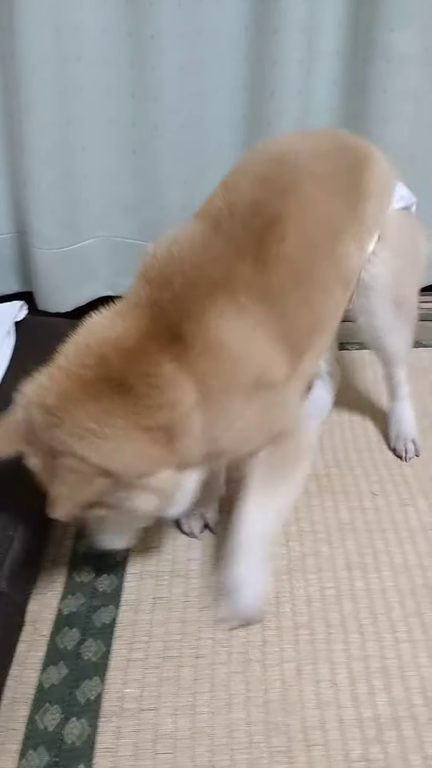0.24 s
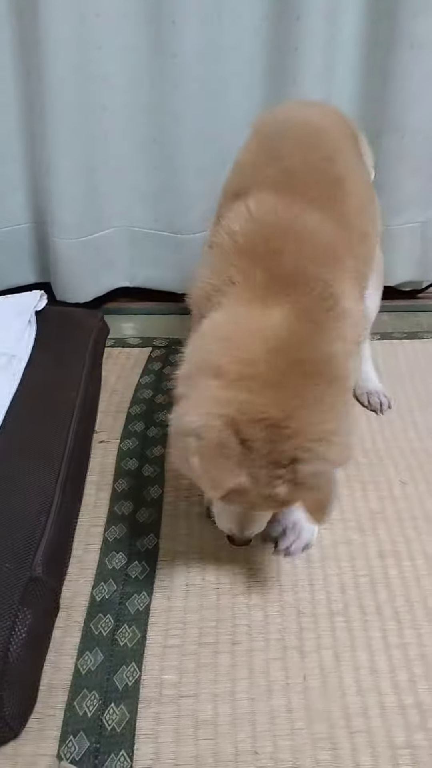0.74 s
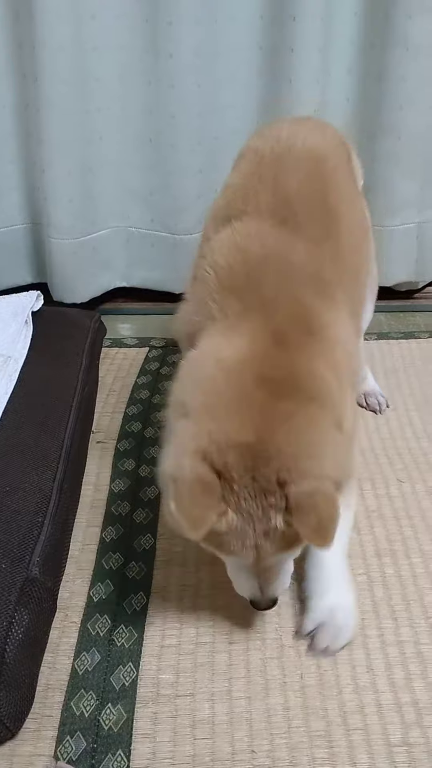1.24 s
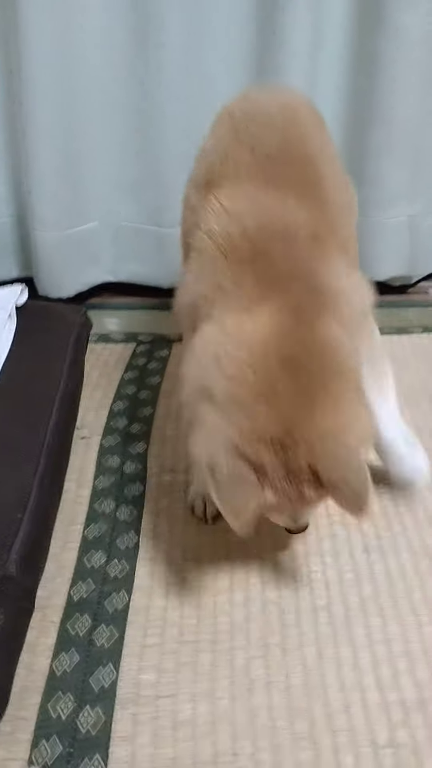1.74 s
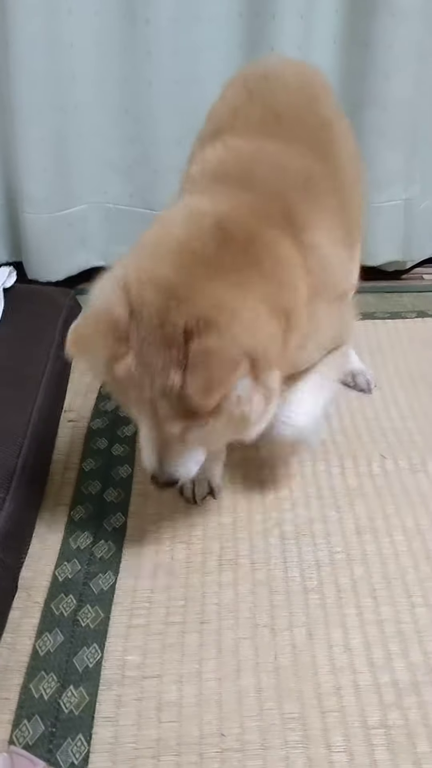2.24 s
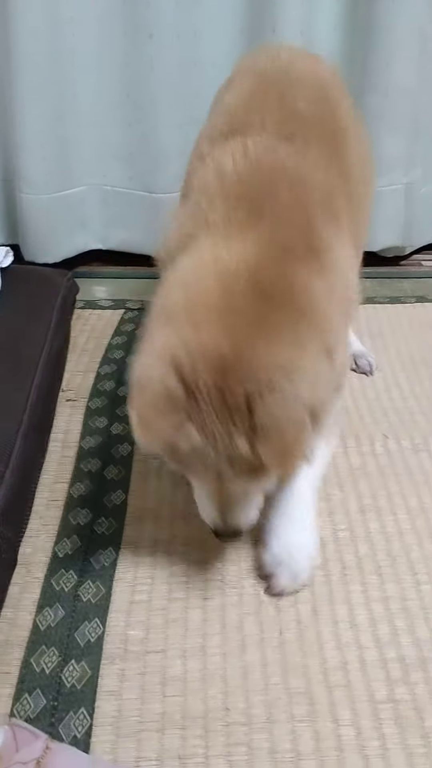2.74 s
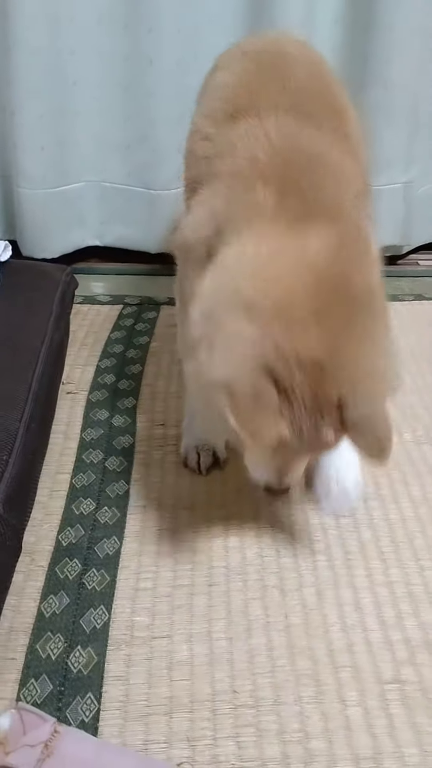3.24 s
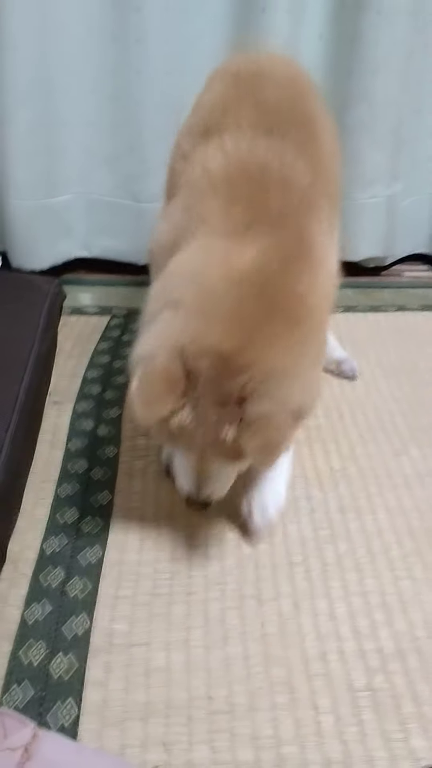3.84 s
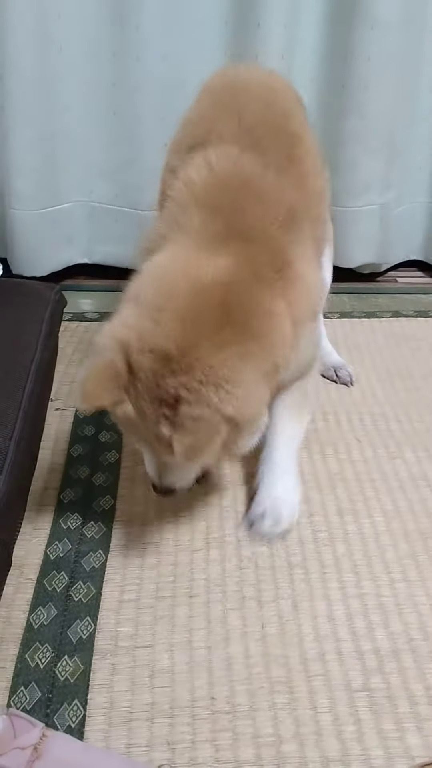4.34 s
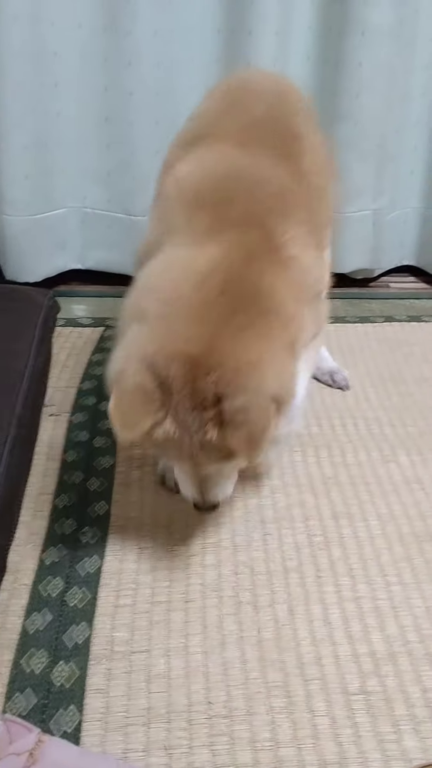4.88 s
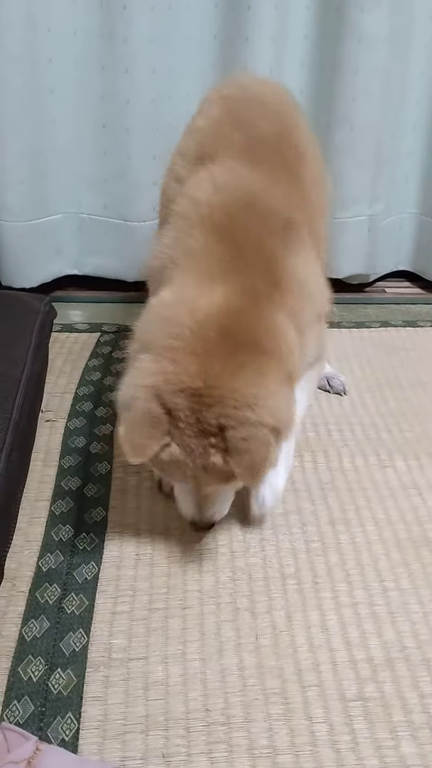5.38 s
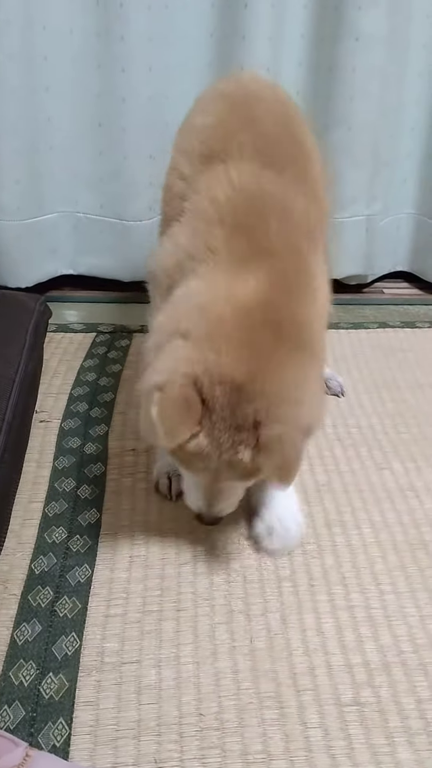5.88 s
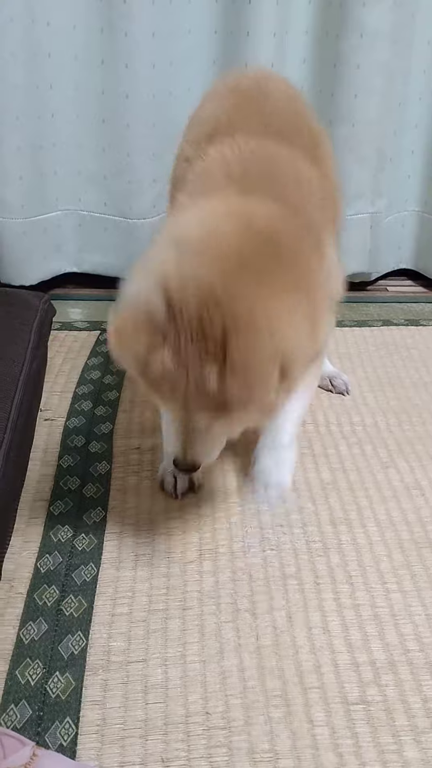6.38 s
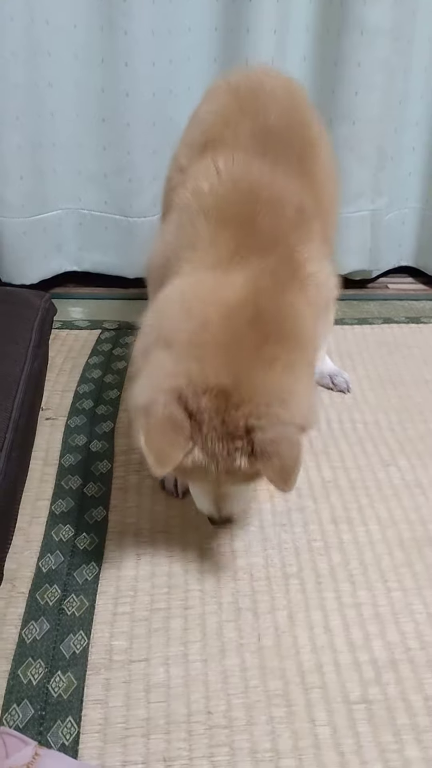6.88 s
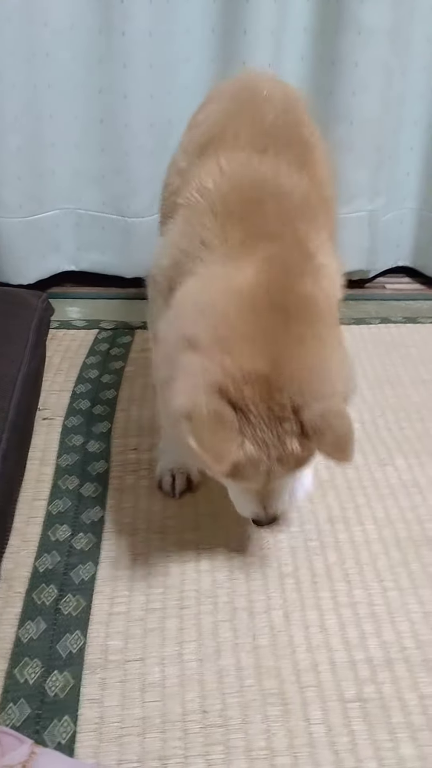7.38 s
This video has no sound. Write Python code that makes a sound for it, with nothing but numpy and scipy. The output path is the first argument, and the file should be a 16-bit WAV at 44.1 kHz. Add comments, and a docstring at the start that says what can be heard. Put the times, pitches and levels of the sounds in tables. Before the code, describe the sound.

A dog's claws scrape a woven straw mat in steady, separate strokes, soft at first, then loud, raspy and crackling, in a small room.

```python
"""A dog digging at a straw mat

A dog digs at a woven straw mat with one forepaw, nearly three strokes a second, in a small curtained room.
The claws pluck the taut straws one by one: each gives a short, damped swing (a dull pop) and a noise burst (a tick).
As the paw speeds up, many tiny random slips run together into a dry rasp, and low filtered noise makes the mat thud.
Soft pads slide on the straw, the floor creaks with fading tones and the dog whines with two wavering whistles.
Echoes of fading noise make the room, and a steady, faint noise lies below."""
import sys
import numpy as np
from scipy import signal
from scipy.fft import rfft, irfft, next_fast_len
from scipy.io import wavfile
from scipy.ndimage import uniform_filter1d, map_coordinates

SR = 44100
rng = np.random.default_rng(int(sys.argv[2]) if len(sys.argv) > 2 else 0)


def bounce(signal):
    """Save signal as a 16-bit WAV file at the path given by the first command-line argument."""
    frames = np.transpose(np.atleast_2d(signal))
    limited = np.clip(frames, -1, 1)
    pcm = np.round(limited * 32767).astype(np.int16)
    wavfile.write(sys.argv[1], SR, pcm)


N = 336042

# Each stroke: the paw lands, drags lightly, bears down, pulls and lifts off. All levels are relative settings.
# (landing time [s], drag length [s], bearing-down length [s], pull length [s], landing level [dB],
#  drag level [dB], then in the pull: plucking [dB], rasp [dB], ticking [dB], thud against the rasp [dB])
STROKES = [(0.182, 0.075, 0.04, 0.1, -62.0, -66.0, -50.5, -55.5, -55.5, -4.0),
           (0.411, 0.056, 0.071, 0.068, -63.0, -62.0, -61.0, -65.5, -64.0, -3.0),
           (0.816, 0.033, 0.04, 0.015, -70.5, -65.0, -53.5, -62.5, -58.0, -4.0),
           (0.994, 0.023, 0.038, 0.007, -64.0, -64.0, -52.0, -57.5, -69.0, -7.0),
           (1.281, 0.131, 0.046, 0.053, -60.5, -55.5, -43.5, -50.5, -50.0, -8.0),
           (1.646, 0.093, 0.061, 0.089, -55.5, -59.0, -39.0, -44.5, -46.0, -11.0),
           (2.068, 0.129, 0.02, 0.047, -49.0, -57.0, -38.0, -41.0, -46.5, -3.0),
           (2.46, 0.123, 0.028, 0.04, -47.5, -48.5, -40.0, -43.0, -45.5, 1.0),
           (2.816, 0.115, 0.041, 0.062, -55.0, -55.5, -37.5, -42.5, -45.0, 1.5),
           (3.211, 0.099, 0.089, 0.072, -51.0, -53.0, -38.0, -43.0, -47.0, 1.0),
           (3.562, 0.11, 0.069, 0.071, -60.5, -67.5, -40.5, -45.0, -49.0, 0.0),
           (3.949, 0.089, 0.049, 0.068, -55.0, -54.0, -40.5, -45.0, -48.0, 0.0),
           (4.33, 0.083, 0.06, 0.073, -53.5, -54.5, -40.0, -48.0, -48.0, -1.0),
           (4.655, 0.15, 0.04, 0.055, -52.0, -57.5, -35.5, -43.0, -42.5, 0.0),
           (5.12, 0.125, 0.062, 0.055, -62.5, -70.5, -41.5, -46.5, -49.0, -2.0),
           (5.531, 0.143, 0.081, 0.067, -61.0, -63.0, -41.0, -44.0, -49.0, 2.5),
           (5.941, 0.109, 0.067, 0.049, -46.5, -54.0, -41.0, -43.0, -45.5, 1.0),
           (6.303, 0.099, 0.045, 0.059, -49.5, -51.5, -37.5, -41.5, -44.0, 2.0),
           (6.701, 0.078, 0.056, 0.09, -60.5, -55.5, -38.5, -45.5, -47.0, 1.0),
           (7.04, 0.204, 0.03, 0.061, -54.0, -62.0, -41.0, -45.5, -46.0, 4.0),
           (7.531, 0.098, 0.064, 0.078, -56.5, -58.5, -38.0, -47.5, -50.5, 3.0)]
# A claw catches hard and snaps free: (time [s], pop level [dB], tick level [dB]), before colouring
SNAGS = [(0.259, -28.5, -33), (0.265, -36, -32), (0.29, -44, -30), (0.363, -44, -37.5), (0.459, -37, -42),
         (0.501, -39, -55), (0.648, -62, -48), (0.676, -67, -41), (0.845, -41, -53), (0.853, -45, -39.5),
         (0.867, -51, -39.5), (0.996, -42, -55), (1.01, -41, -25), (1.327, -40, -37.5), (1.374, -32.5, -43),
         (1.398, -30, -44.5), (1.419, -37.5, -33), (1.682, -37, -42.5), (1.697, -38, -26.5),
         (1.712, -30, -49), (1.722, -27.5, -20), (1.731, -27, -32), (2.139, -37, -40.5), (2.185, -35, -33),
         (2.191, -30, -33), (2.215, -33, -29.5), (2.48, -39, -34.5), (2.487, -39, -45.5),
         (2.501, -41.5, -27.5), (2.51, -24.5, -19), (2.547, -37, -25), (2.575, -27.5, -16.5),
         (2.605, -40, -15), (2.846, -40.5, -30), (2.899, -37.5, -42.5), (2.924, -21.5, -26),
         (2.931, -22.5, -39.5), (3.232, -41.5, -49), (3.263, -31.5, -31), (3.297, -31, -29.5),
         (3.369, -27, -37.5), (3.386, -32.5, -41), (3.601, -41.5, -41.5), (3.635, -33, -36),
         (3.671, -24, -15), (3.726, -29.5, -42.5), (3.748, -30, -46), (3.984, -36, -41),
         (4.051, -26, -37.5), (4.088, -32.5, -33), (4.404, -28.5, -26), (4.435, -32, -28.5),
         (4.692, -44, -35), (4.752, -32, -22), (4.781, -28.5, -38), (4.804, -19, -24),
         (4.808, -17.5, -18.5), (4.812, -22, -28), (4.816, -20.5, -28), (5.193, -33, -37),
         (5.291, -30, -34), (5.612, -32, -40), (5.652, -26, -45), (5.672, -27, -36), (5.723, -24, -40),
         (5.996, -39, -41), (6.058, -24, -28), (6.364, -37.5, -42), (6.387, -22.5, -19),
         (6.396, -23.5, -35), (6.413, -20.5, -32), (6.425, -19.5, -26.5), (6.442, -33, -17),
         (6.732, -38.5, -45.5), (6.77, -24.5, -30.5), (6.783, -28, -43.5), (7.114, -40, -32.5),
         (7.186, -30, -42), (7.232, -29, -21), (7.237, -32, -24), (7.243, -23, -20), (7.253, -23, -31.5),
         (7.564, -39.5, -45.5), (7.585, -32, -50), (7.599, -31.5, -33)]
# Colour of a plucked straw: (frequency [Hz], gain [dB])
PLUCK_COLOUR = [(30, -35.5), (100, -29.5), (300, -4.5), (600, 4), (1800, -0.5), (2800, 4), (4500, -9.5),
                (9000, -17)]
# Colour of claws scraping fine fibres: (frequency [Hz], gain [dB])
RASP_COLOUR = [(100, -24), (250, -20.5), (500, 3), (900, 4.5), (2000, 1.5), (3000, 5.5), (4200, 3),
               (6000, 0), (8500, -1), (16000, -16.5)]
# Colour of a hard claw tip on dry straw: (frequency [Hz], gain [dB])
TICK_COLOUR = [(500, -22), (2500, -8), (5000, -4), (9000, -1), (16000, 0)]


def amp(db):
    """Decibels turned into a plain multiplier."""
    return 10 ** (np.asarray(db) / 20)


def unit(x):
    """x scaled to an average (rms) strength of 1."""
    return x / np.sqrt(np.mean(x ** 2) + 1e-20)


def along(points, hz):
    """Values between (frequency, value) points, read on a log frequency axis."""
    f, v = np.transpose(points)
    return np.interp(np.log(hz + 1), np.log(f + 1), v)


def curves(rows):
    """One value per sample for each column after the time."""
    s, *columns = np.transpose(sorted(map(tuple, rows)))
    return [np.interp(np.arange(N) / SR, s, column) for column in columns]


def filtered(x, response):
    """x times a complex response at each frequency."""
    size = x.shape[-1]
    padded = next_fast_len(size + SR // 4)
    spectrum = rfft(x, padded) * response(np.fft.rfftfreq(padded, 1 / SR))
    return irfft(spectrum, padded)[..., :size]


def coloured(x, db_of_hz, size=8192):
    """x through a filter with the given gain that, like a real object, never answers before it is struck."""
    cepstrum = irfft(np.log(amp(db_of_hz(np.fft.rfftfreq(size, 1 / SR)))))
    # folding the second half onto the first puts the whole answer after the strike
    cepstrum[1:size // 2] *= 2
    cepstrum[size // 2 + 1:] = 0
    answer = irfft(np.exp(rfft(cepstrum)))
    return signal.fftconvolve(x, np.array(answer, ndmin=x.ndim), axes=-1)[..., :N]


def shaped(x, spectrum):
    """x coloured by (frequency, gain) points."""
    return coloured(x, lambda hz: along(spectrum, hz))


def placed(times, grains):
    """Sum of short sounds, one row each, starting at their times."""
    starts = np.round(np.maximum(times, 0) * SR).astype(int)
    at = starts[:, None] + np.arange(grains.shape[1])
    return np.bincount(at.ravel(), grains.ravel(), N)[:N]


def diffuse(pair):
    """Two unrelated noises mixed as two microphone ports hear them: more alike in the bass."""
    # Sound from all sides at the two ports: (frequency [Hz], likeness [0 to 1])
    likeness = [(100, 0.913), (300, 0.63), (700, 0.696), (1400, 0), (3000, 0), (7000, 0)]

    def shares(hz):
        turn = np.arccos(np.clip(along(likeness, hz), -1, 1)) / 2
        return np.array([np.cos(turn), np.sin(turn)])

    mid, side = filtered(pair, shares)
    return np.array([mid + side, mid - side])


def stroke_level(rule, pull_column, bear_down_db=20, grip_s=0.034, touch_db_per_s=560):
    """Level [dB] of one sound: each stroke is a pat, a light drag, then a pull that swells, sags and is released."""
    pat_share, drag_share, lag, sag, fade = rule
    power = np.zeros(N)
    for stroke in STROKES:
        s, drag_s, bear_s, pull_s, land_db, drag_db = stroke[:6]
        start = round(s * SR)
        age = np.arange(min(SR // 2, N - start)) / SR
        pulled = np.maximum(age - drag_s, 0)
        pat = land_db + pat_share - touch_db_per_s * age
        # the claws reach the straw only grip_s after the landing
        off_straw = np.maximum(grip_s - age, 0) + pulled
        drag = drag_db + drag_share - touch_db_per_s * off_straw
        # the scrape grows while the paw bears down at the end of the drag
        swell = -bear_down_db * (np.minimum(age - drag_s - lag, 0) / bear_s) ** 2
        lifted = np.maximum(pulled - pull_s, 0)
        pull = stroke[pull_column] + swell - sag * pulled - fade * lifted
        power[start:start + len(age)] += amp(pat) ** 2 + amp(drag) ** 2 + amp(pull) ** 2
    return 10 * np.log10(power + 1e-12)


def stroke_levels(waver_db=1.0, waver_rate=45):
    """Plucking, rasp and ticking levels [dB]: they waver together as the claws press unevenly, and die as the paw lifts."""
    # How each sound follows a stroke: (level over the landing [dB], level over the drag [dB], lag [s],
    # sag in the pull [dB/s], fade after the lift [dB/s])
    pluck_rule = (-4, -2.5, 0, 70, 490)
    rasp_rule = (-8, -6, 0.006, 16, 520)
    tick_rule = (-18, -6, 0, 98, 490)
    # waver_rate random values a second, joined smoothly
    knots = rng.standard_normal(int(N * waver_rate / SR) + 4).clip(-1.5, 1.5)
    grip_db = waver_db * map_coordinates(knots, [np.arange(N) * waver_rate / SR])
    layers = [(pluck_rule, 6), (rasp_rule, 7), (tick_rule, 8)]
    return [stroke_level(rule, column) + grip_db for rule, column in layers]


def crossings(rate, scatter):
    """Uneven times at which claws cross a straw, and the rate [per second] at each."""
    passed = np.cumsum(rate) / SR
    marks = np.arange(int(passed[-1]))
    uneven = marks + scatter * rng.standard_normal(len(marks))
    at = np.minimum(np.searchsorted(passed, uneven), N - 1)
    return at / SR, rate[at]


def pops(hz, cycles, size=400):
    """A plucked straw swings about twice before the padding stops it; the outline of the swing peaks at 1."""
    phase = hz[:, None] * np.arange(size) / SR
    outline = phase / cycles * np.exp(1 - phase / cycles)
    return -np.sin(2 * np.pi * phase) * outline


def ticks(count, life, size=160):
    """Hard claw on dry straw: noise bursts that fade with the given life [s]."""
    return rng.standard_normal((count, size)) * np.exp(-np.arange(size) / SR / life)


def plucking(pluck_db, tick_db, speed, slow_rate=200, fast_rate=400, pop_hz=1400, rise=0.217,
             spread=0.2855, size_db=3, tick_size_db=3.6):
    """Claws ride over the weave: more and higher pops as the paw gains speed. Also gives the jerk of each release."""
    times, rate = crossings(slow_rate + (fast_rate - slow_rate) * speed, scatter=.35)
    force, pitch, sharpness = rng.standard_normal((len(times), 3)).clip(-1.7, 1.7).T
    speed_then = np.interp(times, np.arange(N) / SR, speed)
    hz = pop_hz * np.exp(rise * speed_then + spread * pitch)
    # dividing by the rate keeps the strength even where pops crowd together
    pop_size = amp(size_db * force) * np.sqrt(hz / rate)
    tick_size = amp(tick_size_db * (force + sharpness) / np.sqrt(2)) / np.sqrt(rate)
    swings = pop_size[:, None] * pops(hz, cycles=0.4964)
    cracks = tick_size[:, None] * ticks(len(times), life=0.00087)
    dull = shaped(placed(times, swings), PLUCK_COLOUR)
    bright = shaped(placed(times, cracks), TICK_COLOUR)
    jerk = placed(times, tick_size[:, None] * np.exp(-np.arange(SR // 100) / SR / .0017))
    plucks = amp(pluck_db - 1.3) * unit(dull) + amp(tick_db + 4.9) * unit(bright)
    return plucks, unit(jerk)


def fibres(rate, size_db):
    """Tiny random slips across the width of the paw, as both ports hear them; rate is per second."""
    slips = (rng.random((2, N)) < rate / SR) * np.sign(rng.standard_normal((2, N)))
    sizes = amp(size_db * rng.standard_normal((2, N)).clip(-2, 2))
    return diffuse(slips * sizes)


def rasping(rasp_db, jerk, steady=0.584):
    """Fine fibres catch and slip under the claws, most of all just after each straw lets go."""
    slips = (steady + jerk) * fibres(rate=3500, size_db=4)
    return amp(rasp_db + 2) * unit(shaped(slips, RASP_COLOUR))


def held(hold_db=-8, hold=0.00459):
    """A caught claw stands still for a few milliseconds before it snaps free, so the scraping dips."""
    t = np.arange(N) / SR
    releases = np.append(np.sort(np.array(SNAGS)[:, 0]), np.inf)
    wait = releases[np.searchsorted(releases, t)] - t
    # a short running average softens the sudden end of each dip
    stillness = uniform_filter1d(np.exp(-(wait / hold) ** 2), size=32)
    return amp(hold_db * stillness)


def snags(speed, slow_hz=1270, rise=0.3, spread=0.05):
    """Single hard catches of a claw: a pop of the straw, higher under a fast paw, and a tick of the claw tip."""
    s, pop_db, tick_db = np.transpose(SNAGS)
    speed_then = np.interp(s, np.arange(N) / SR, speed)
    hz = slow_hz * np.exp(rise * speed_then + spread * rng.standard_normal(len(s)))
    swings = amp(pop_db)[:, None] * pops(hz, cycles=.5)
    cracks = ticks(len(s), life=.0005)
    cracks = cracks / np.abs(cracks).max(axis=1, keepdims=True)
    cracks = amp(tick_db)[:, None] * cracks
    return shaped(placed(s, swings), PLUCK_COLOUR) + shaped(placed(s, cracks), TICK_COLOUR)


def landings(pop_db=10, pop_hz=1250, crack_db=1.5, tick_db=0, second_claw_s=0.008, second_claw_db=-4):
    """At each landing two claws touch down in turn; each pops one straw, with a dry crack and a bright tick."""
    s, land_db = np.array(STROKES)[:, [0, 4]].T
    s = np.append(s, s + second_claw_s)
    size = amp(np.append(land_db, land_db + second_claw_db))[:, None]
    # pop, crack and tick are set against the level of the landing
    swings = amp(pop_db) * pops(np.full(len(s), pop_hz), cycles=.5)
    cracks = placed(s, size * ticks(len(s), life=.001))
    popped = shaped(placed(s, size * swings), PLUCK_COLOUR)
    dry_crack = amp(crack_db) * shaped(cracks, RASP_COLOUR)
    return popped + dry_crack + amp(tick_db) * shaped(cracks, TICK_COLOUR)


def thudding(rasp_db):
    """The thick mat shakes with the force of the stroke, more when the dog leans on the paw."""
    # Colour of the shaking mat: (frequency [Hz], gain [dB])
    thud_colour = [(20, -37), (35, -22.5), (55, -1), (110, -3.5), (170, 2), (250, 7), (450, 4), (900, -0.5),
                   (3000, -55)]
    strokes = np.array(STROKES)
    current = np.maximum(np.searchsorted(strokes[:, 0], np.arange(N) / SR) - 1, 0)
    thud_db = rasp_db + strokes[current, -1] - 20
    return amp(thud_db) * unit(shaped(rng.standard_normal(N), thud_colour))


def sliding():
    """Soft pads rub the straw with a dull, dense grain."""
    # The pads slide over the mat before the claws bite: (time [s], level [dB])
    slide = [(7.036, -88), (7.047, -49), (7.068, -47), (7.11, -52), (7.138, -61), (7.16, -47), (7.192, -43),
             (7.215, -57), (7.25, -77.5)]
    # Colour of sliding pads: (frequency [Hz], gain [dB])
    pad_colour = [(100, -31.5), (400, -5.5), (800, -4), (1230, 5.5), (1600, -3.5), (2100, -8),
                  (3200, -12.5), (9000, -52), (16000, -42)]
    level_db, = curves(slide)
    return amp(level_db) * unit(shaped(fibres(rate=5000, size_db=2), pad_colour))


def mat_resonance(paw):
    """The mat on its floor strengthens some pitches of the paw's sounds and weakens others."""
    # Resonances of the mat: (centre [Hz], width [Hz], lift [dB])
    resonances = [(252.7, 11.4, 0.5), (736, 50, 1.5), (893.2, 118, 3), (1296, 450, -2.5), (1630, 160, 2),
                  (2570, 30, -4.5)]

    def lift(hz):
        return sum(db / (1 + (2 * (hz - centre) / width) ** 2) for centre, width, db in resonances)

    return coloured(paw, lift)


def boards(attack=0.00125):
    """Short low creaks and a footfall as the dog shifts its weight: pure tones that start fast and fade."""
    # The floor gives: (time [s], level [dB], frequency [Hz], time to fade by 60 dB [s])
    creaks = [(0.509, -62, 87, 0.09), (3.775, -49, 380, 0.049), (3.79, -49, 330.2, 0.102),
              (3.824, -53, 346.6, 0.045), (3.867, -53, 342, 0.027)]
    s, db, hz, t60 = np.transpose(creaks)[:, :, None]
    t = np.arange(SR // 4) / SR
    ring = amp(db) * np.exp(-np.log(1000) * t / t60) * np.sin(2 * np.pi * hz * t)
    return placed(s[:, 0], ring * (1 - np.exp(-t / attack)))


def whine(waver=0.011, waver_rate=120, upper_ratio=1.17):
    """Two unsteady whistles through the nose that glide together, the upper one weaker."""
    # The thin, high whine: (time [s], lower whistle [Hz], its level [dB])
    glide = [(2.69, 4600, -83), (2.73, 4380, -70), (2.78, 4370, -73), (2.825, 4480, -70.5),
             (2.87, 4500, -93.5), (3.03, 3650, -97.5), (3.08, 3636, -72), (3.13, 3763, -74.5),
             (3.17, 3850, -95)]
    hz, db = curves(glide)
    sounding = np.interp(np.arange(N) / SR, [glide[0][0], glide[-1][0]], [1, 1], left=0, right=0)

    def whistle(pitch):
        knots = rng.standard_normal(int(N * waver_rate / SR) + 4)
        unsteady = map_coordinates(knots, [np.arange(N) * waver_rate / SR])
        return np.sin(2 * np.pi * np.cumsum(pitch * (1 + waver * unsteady)) / SR)

    return sounding * amp(db) * (whistle(hz) + .7 * whistle(upper_ratio * hz))


def direct_sound(dog, lag_samples=2.763):
    """Sound travels straight to both ports; the right one, being nearer, hears it a moment sooner."""
    sides = np.array([[-1j], [1j]])
    return filtered(dog, lambda hz: np.exp(sides * np.pi * hz * lag_samples / SR))


def room_tail(build=0.00185, early=1.81, early_life=0.00262):
    """Close reflections off floor and dog, then a short diffuse answer of the room; energy 1 at each port."""
    # How long the room rings: (frequency [Hz], time to fade by 60 dB [s])
    ring_times = [(150, 0.245), (400, 0.2464), (1000, 0.1696), (3000, 0.2193), (7500, 0.2113),
                  (15000, 0.162)]
    hz, t, z = signal.stft(rng.standard_normal((2, SR // 3)), SR, nperseg=256)
    fade = np.exp(-np.log(1000) * t / along(ring_times, hz)[:, None])
    tail = signal.istft(z * fade, SR, nperseg=256)[1]
    age = np.arange(tail.shape[1]) / SR
    tail = diffuse(tail) * (1 - np.exp(-age / build)) * (1 + early * np.exp(-age / early_life))
    return tail / np.linalg.norm(tail, axis=1, keepdims=True)


def room(x):
    """The paw lands somewhere else each time, so every stroke has its own echoes."""
    wet = np.zeros((2, N + SR))
    edges = [0] + [int(stroke[0] * SR) for stroke in STROKES[1:]] + [N]
    for a, b in zip(edges, edges[1:]):
        answer = signal.fftconvolve(x[:, a:b], room_tail(), axes=1)
        wet[:, a:a + answer.shape[1]] += answer
    return wet[:, :N]


def room_noise():
    """A faint, steady noise from all around: random noise given a fixed colour."""
    # Colour of the room noise: (frequency [Hz], gain [dB])
    air_colour = [(15, -51), (25, -18.5), (285, -13.5), (734, -5), (818, -6.5), (911, -6.5), (988, -6),
                  (1190, -7.5), (3520, -14), (4370, -14.5), (5880, -17.5), (8830, -19.5), (16000, -22.5)]
    return amp(-70.2) * unit(diffuse(shaped(rng.standard_normal((2, N)), air_colour)))


def scene(slow_db=-62, fast_db=-42):
    """The dog's sounds, a little to the right, with their echoes and the steady room noise."""
    pluck_db, rasp_db, tick_db = stroke_levels()
    # a faster paw rasps louder: 0 is slow, 1 is full speed
    speed = np.clip((rasp_db - slow_db) / (fast_db - slow_db), 0, 1)
    plucks, jerk = plucking(pluck_db, tick_db, speed)
    scraping = held() * (plucks + rasping(rasp_db, jerk))
    paw = scraping + landings() + snags(speed) + thudding(rasp_db) + sliding()
    dog = mat_resonance(paw) + boards() + whine()
    echoes = amp(-3.5) * room(dog)
    return direct_sound(dog) + echoes + room_noise()


def record(dry, low_hz=45, top_hz=15880):
    """Each microphone port has its own colour; the deep bass rolls off and nothing is kept above top_hz."""
    # Colour of the two ports: (frequency [Hz], left gain [dB], right gain [dB])
    port_colour = np.array([(300, 0, 0), (750, 1.1, -1.1), (1100, 0, -.5), (1600, 1.3, -1.3), (2800, -1, 1),
                            (4500, -1.2, 1.2), (6000, -.3, .3), (8700, 1.5, -1.5), (10500, -8, 0),
                            (12300, -5, -.5), (15000, -5, 3)])
    left, right = port_colour[:, [0, 1]], port_colour[:, [0, 2]]

    def response(hz):
        bass_cut = (1j * hz / (low_hz + 1j * hz)) ** 2
        return amp([along(left, hz), along(right, hz)]) * bass_cut * (hz < top_hz)

    return filtered(dry, response)


dry = scene()
out = record(dry)
bounce(out)
```